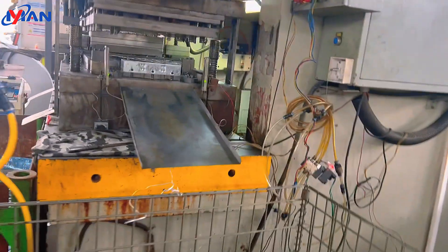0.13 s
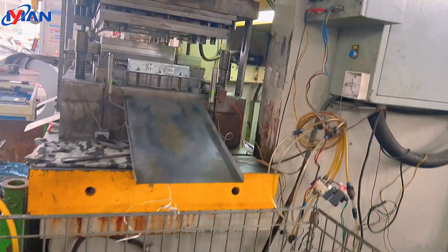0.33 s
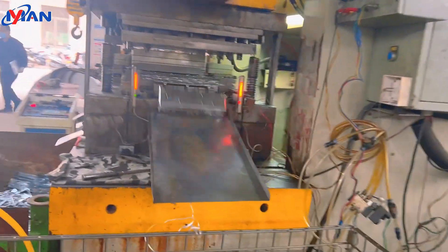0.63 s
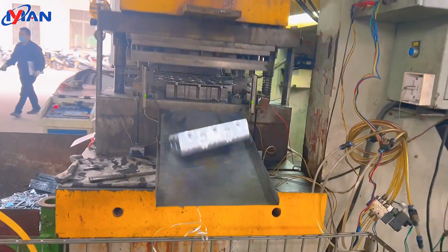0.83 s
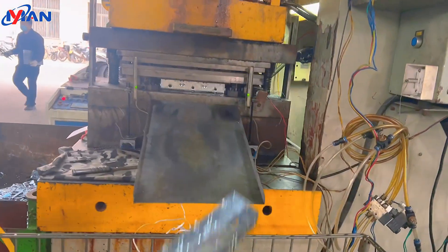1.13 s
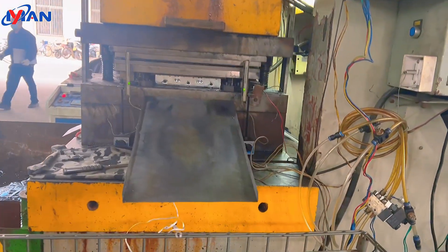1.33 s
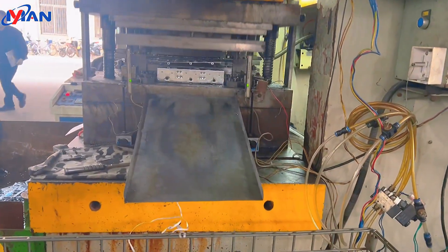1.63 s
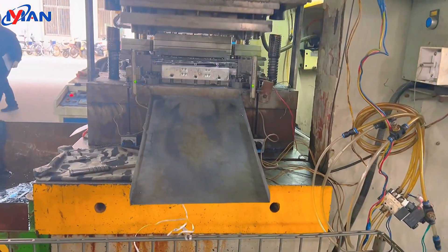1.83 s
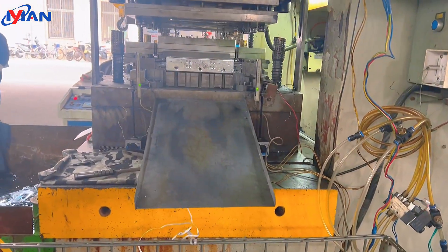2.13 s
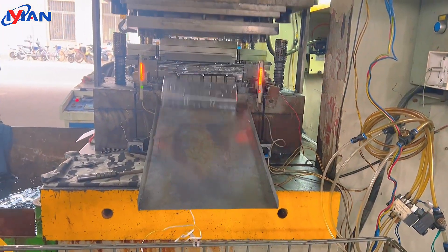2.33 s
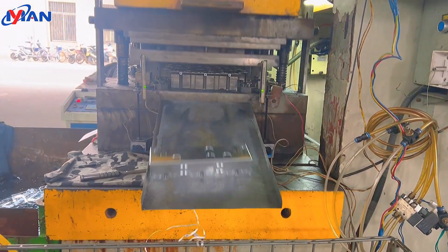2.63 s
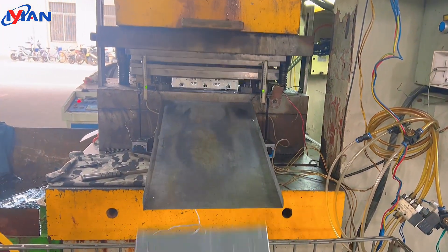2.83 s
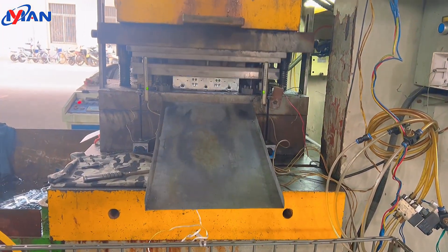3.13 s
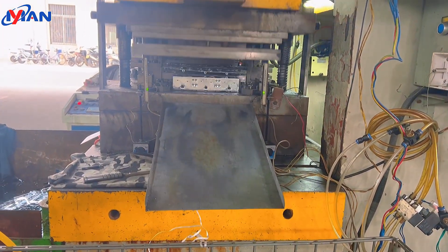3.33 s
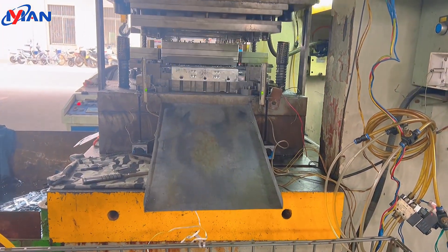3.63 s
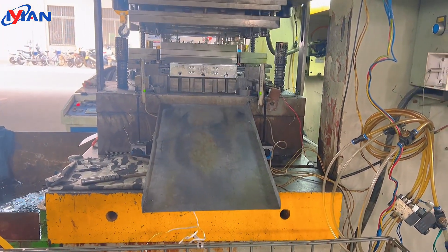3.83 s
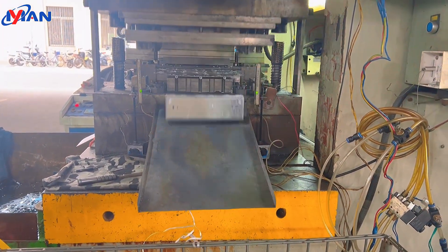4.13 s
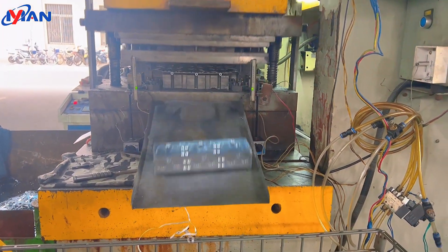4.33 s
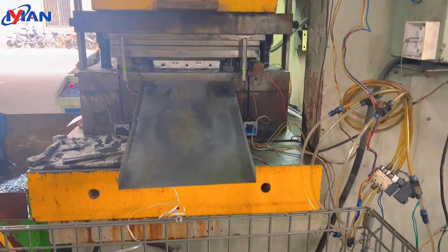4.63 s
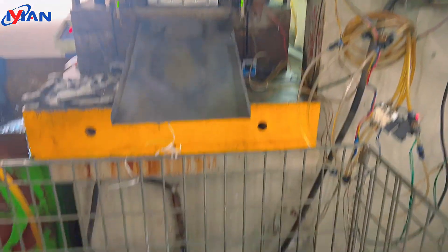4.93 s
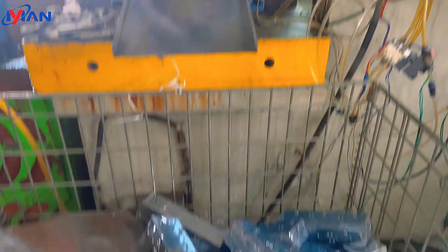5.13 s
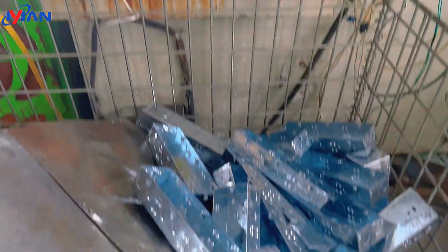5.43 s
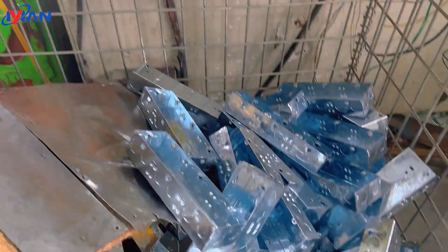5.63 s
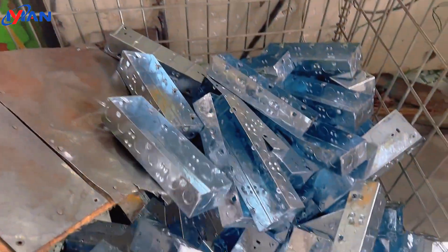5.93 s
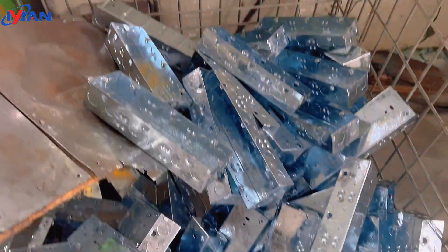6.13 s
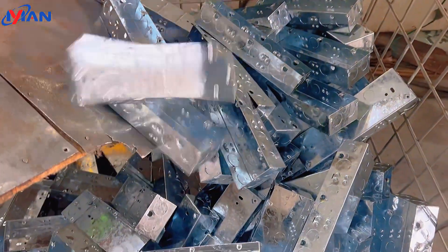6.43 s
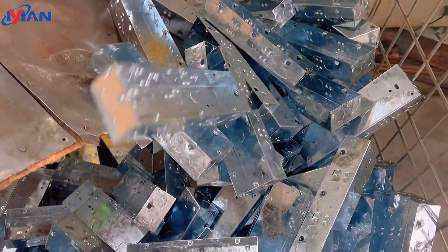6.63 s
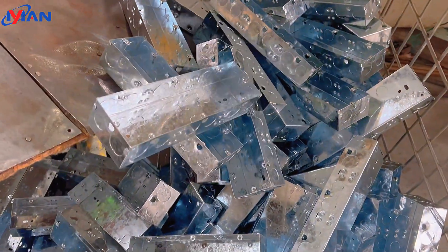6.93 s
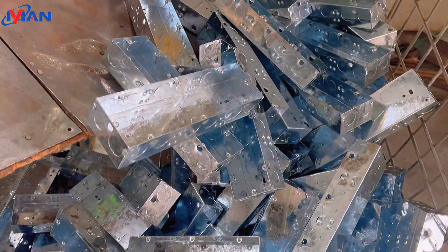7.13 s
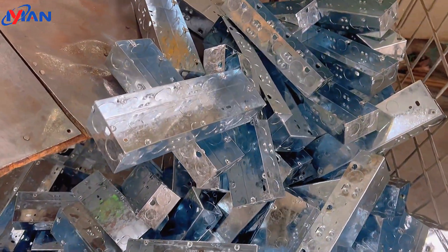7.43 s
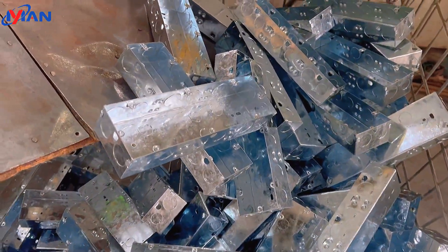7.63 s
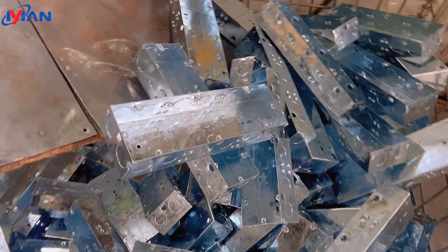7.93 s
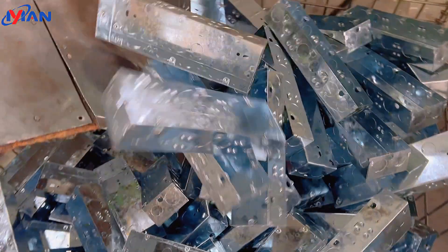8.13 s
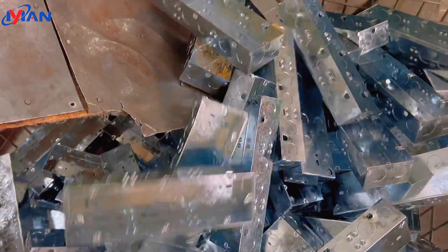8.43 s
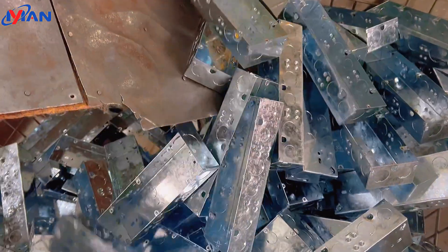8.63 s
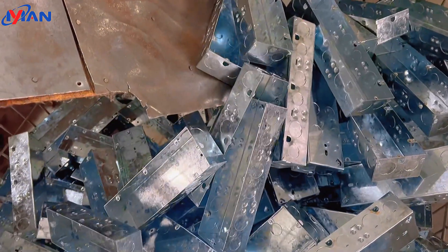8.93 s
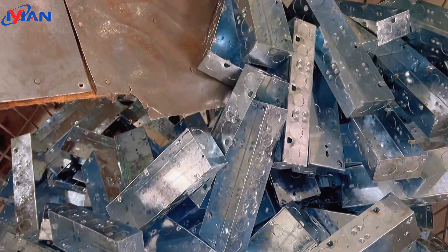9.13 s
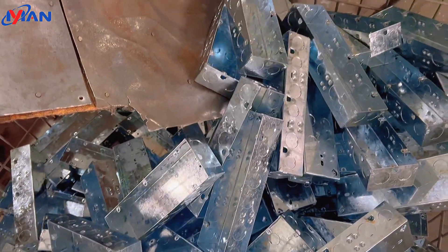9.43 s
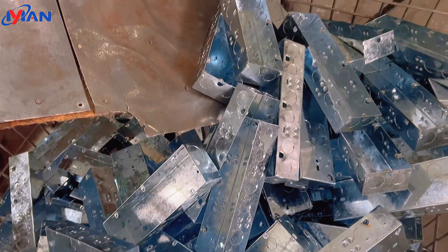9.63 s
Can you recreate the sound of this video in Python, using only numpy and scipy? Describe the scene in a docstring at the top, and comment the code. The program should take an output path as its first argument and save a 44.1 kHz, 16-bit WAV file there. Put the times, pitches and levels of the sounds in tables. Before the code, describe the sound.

A mechanical press thuds every 1.7 seconds over a steady shop drone while sheet-steel brackets clang, skid down a chute and crash onto a heap.

```python
"""In a workshop, a mechanical press stamps sheet-steel brackets, one stroke every 1.7 s, over a steady shop drone.
Each stroke strikes the resonant frame in a fixed series of blows and ends in a short stick-slip groan.
The mechanism squeaks once a turn. Between strokes a bracket is kicked off the die, rocks, drops onto a chute,
skids down it and crashes onto the heap just after the next stroke: coloured noise grains drive the sheet's modes."""
import sys
import numpy as np
from scipy import signal
from scipy.fft import rfft, irfft, next_fast_len
from scipy.io import wavfile
from scipy.ndimage import uniform_filter1d

SR = 44100
rng = np.random.default_rng(int(sys.argv[2]) if len(sys.argv) > 2 else 0)


def generate_wav(sig):
    """Save sig (samples, or channels by samples) to the path in sys.argv[1] as 16-bit PCM at SR."""
    pcm = np.round(np.clip(np.atleast_2d(sig).T, -1, 1) * 32767).astype(np.int16)
    wavfile.write(sys.argv[1], SR, pcm)


N = 431298
TIME = np.arange(N) / SR

# The punch meets the strip. Each row: contact in seconds, strength in dB.
PRESS_STROKES = [(-.635, 3), (1.073, 4), (2.780, 1.5), (4.489, 0.5), (6.197, 0), (7.905, 0), (9.613, -2.5)]
# The ejector kicks a finished bracket off the die. Each row: start in seconds, clang in dB, low ring in dB.
EJECTOR_KICKS = [(0.4274, -10, -20), (2.132, -14, -22), (3.840, -15, -14), (5.458, -11, -19),
                 (7.2586, -18, -37), (8.963, -21, -23)]
# A bracket lands and the heap settles. Each row: start in seconds, clang in dB, settling in seconds, settling in dB.
HEAP_LANDINGS = [(1.2477, -5.5, 0.36, -15.5), (2.9624, -7.5, .24, -12), (4.6628, -17, 0.4, -14),
                 (6.3721, -10.5, 0.3, -14.5), (8.0747, -4, .3, -14.5)]


def from_db(db):
    """Decibels to amplitude gain."""
    return 10 ** (np.asarray(db) / 20)


def rms_one(x):
    """Scale to unit power."""
    return x / np.sqrt(np.mean(x ** 2) + 1e-20)


def per_bin(points):
    """A table interpolated over log frequency, read at every FFT bin."""
    hz, value = np.transpose(points)
    bin_hz = np.fft.rfftfreq(next_fast_len(N), 1 / SR)
    return np.interp(np.log(bin_hz + 1), np.log(hz), value)


def add(track, s, sound):
    """Mix a sound into a track from time s on."""
    at = round(s * SR)
    sound, at = sound[max(-at, 0):], max(at, 0)
    track[at:at + len(sound)] += sound[:max(N - at, 0)]


def dying(t, t60):
    """Exponential decay, 60 dB in t60 seconds."""
    return np.exp(-np.log(1000) * t / t60)


def cycle(rows):
    """A level curve repeated at every stroke and scaled by its strength, as a gain."""
    after, db = np.transpose(rows)
    shape = from_db(np.interp(np.arange(after[0], after[-1], 1 / SR), after, db))
    out = np.zeros(N)
    for s, strength_db in PRESS_STROKES:
        add(out, s + after[0], from_db(strength_db) * shape)
    return out


def grains(spectrum, spread_db):
    """Stereo stream of tiny contacts of uneven size, coloured by a spectrum; rms 1."""
    # How alike left and right are at each frequency. Each row: frequency in Hz, likeness from 0 to 1.
    likeness = [(30, .99), (120, 1), (500, 0.8), (1000, 0.7), (2000, 0.68), (4000, 0.22), (8000, 0.9),
                (15000, 1)]
    size_db = spread_db * np.repeat(rng.standard_normal(N // 32 + 1), 32)[:N]
    noise = rng.standard_normal((2, N)) * from_db(size_db)
    mid, side = rfft(noise, next_fast_len(N)) * from_db(per_bin(spectrum))
    alike = np.clip(per_bin(likeness), 0, 1)
    stereo = np.sqrt(1 + alike) * mid + np.sqrt(1 - alike) * side * [[1], [-1]]
    return rms_one(irfft(stereo, next_fast_len(N))[:, :N])


def ring(force, hz, t60):
    """Two-pole mode: a unit click sets a sine of height 1 ringing."""
    r, w = from_db(-60 / (t60 * SR)), 2 * np.pi * hz / SR
    return signal.lfilter([0, np.sin(w)], [1, -2 * r * np.cos(w), r * r], force + 1e-18)


def resonance(x, hz, width_hz):
    """Two-pole band-pass with gain 1 on top."""
    r = np.exp(-np.pi * width_hz / SR)
    zeros = np.array([1, 0, -1]) * (1 - r * r) / 2
    poles = [1, -2 * r * np.cos(2 * np.pi * hz / SR), r * r]
    return signal.lfilter(zeros, poles, x + 1e-18)


def slip(hz, length, edge, overtone_db, waver):
    """A burst of stick-slip: a slightly unsteady tone and its octave that stop when the parts let go."""
    t = np.arange(round((length + edge) * SR)) / SR
    wander = np.interp(t, np.linspace(0, t[-1], num=8), rng.standard_normal(8))
    phase = 2 * np.pi * np.cumsum(hz * (1 + waver * wander)) / SR
    envelope = np.interp(t, [0, edge, length, length + edge], [0, 1, 1, 0])
    return envelope * (np.sin(phase) + from_db(overtone_db) * np.sin(2 * phase))


def shop_drone():
    """Motor, flywheel and the rest of the shop: steady coloured noise."""
    # Each row: frequency in Hz, relative level in dB per Hz.
    drone_colour = [(25, -12), (55, 7.5), (100, -5), (170, 3.5), (300, 0), (500, -2.5), (1000, -4.5),
                    (2500, -26), (4000, -14.5), (9000, -64), (16000, -82)]
    return from_db(-40) * grains(drone_colour, spread_db=1.0)


def workshop(x, t60, treble_t60, wet_db):
    """A diffuse tail, different left and right, whose treble dies first."""
    t = TIME[:SR]
    noise = rng.standard_normal((2, SR))
    dull = signal.sosfilt(signal.butter(2, 2500, fs=SR, output="sos"), noise)
    tail = dull * dying(t, t60) + 2.1 * (noise - dull) * dying(t, treble_t60)
    tail *= t > .005
    tail *= from_db(wet_db) / np.sqrt(np.sum(dying(t, t60) ** 2))
    return x + signal.fftconvolve(x, tail, axes=1)[:, :N]


def edge_squeal():
    """The last bracket skids off the die on its edge and squeals by stick-slip."""
    out = np.zeros(N)
    squeal = slip(hz=2950, length=0.055, edge=0.019, overtone_db=-25, waver=0.008)
    add(out, 9.008, from_db(-22.5) * squeal)
    return out


def squeaks():
    """A thin squeal in a dry joint, which then lets go with a chirp, a tick and a short, lower clack."""
    # The joint slips once a turn. Each row: release in seconds, chirp in dB.
    joint_slips = [(0.078, -12.5), (1.7868, -8.5), (3.494, -11), (5.205, -14), (6.911, -19), (8.62, -26)]
    out, release = np.zeros((2, N))
    for s, db in joint_slips:
        squeal = slip(hz=2570, length=0.054, edge=0.0063, overtone_db=-28, waver=0.0088)
        add(out, s - .085, from_db(db - 20.5) * squeal)
        chirp = slip(hz=1996, length=0.00404, edge=0.0012, overtone_db=-20, waver=0.1)
        add(out, s, from_db(db) * chirp)
        add(release, s + .003, from_db([db]))
    clack = from_db(-11.0) * ring(release, hz=1390, t60=0.064)
    clack += from_db(-15) * ring(release, hz=2385, t60=0.1)
    burst = rng.standard_normal(2048) * dying(TIME[:2048], t60=.03)
    tick = signal.fftconvolve(release, burst)[:N]
    return out + clack + from_db(-10.0) * tick


def chatter(t60):
    """A crack and a dying chatter, as a gain."""
    t = TIME[:SR // 2]
    return dying(t, max(t60, .02)) + 0.1 * dying(t, t60=0.0079)


def rubbing(length, fade_db_per_s):
    """Loose steel starts to move at once, loses energy steadily, then comes to rest."""
    attack_s, release_t60_s = .008, .6
    t = TIME[:SR]
    moving = np.minimum(t / attack_s, 1) * from_db(-fade_db_per_s * t)
    return moving * dying(np.maximum(t - length, 0), release_t60_s)


def bracket_hits():
    """Every hit, sorted: start s, clang dB, leading mode Hz, low ring dB, crash dB, chatter t60 s."""
    # A bracket rocks, then drops flat onto the chute.
    # Each row: start in seconds, clang in dB, leading mode in Hz, low ring in dB.
    knocks = [(0.4777, -14.5, 2900, -16.5), (0.5197, -11.5, 2740, -26), (0.601, -14, 2070, -15),
              (2.1922, -15, 2090, -23), (2.283, -14, 2020, -10), (3.8874, -17.5, 2690, -13.5),
              (4.0116, -16.5, 2000, -11.5), (5.6115, -17, 2780, -20), (5.746, -31, 2720, -20),
              (7.3135, -17.5, 2860, -24.5), (7.3448, -20.5, 3020, -28), (7.4505, -19.5, 2026, -11),
              (8.965, -21.5, 2920, -24.5), (9.024, -23.5, 2810, -47), (9.3125, -32, 2940, -32.5)]
    # An edge strikes the chute or other brackets.
    # Each row: start in seconds, clang in dB, low ring in dB, crash in dB.
    clashes = [(0.203, -20, -31.5, -31), (0.7394, -16, -27, -27), (0.8617, -8, -25, -15.5),
               (1.3355, -11, -17, -20.5), (1.3987, -15.5, -24, -25.5), (2.2703, -12, -34, -33.5),
               (2.4274, -7.5, -18.5, -21.5), (2.6517, -14, -32, -27), (3.053, -8, -15, -21),
               (3.306, -8.5, -27, -21), (3.456, -35, -38, -25.5), (3.5234, -10, -24.5, -28),
               (4.1632, -22, -26.5, -29.5), (4.2976, -14, -31, -20), (4.6893, -9.5, -27, -20),
               (4.8127, -12.5, -21.5, -22.5), (4.9755, -17, -29, -27), (5.123, -19.5, -38, -36),
               (5.2644, -18, -43, -32.5), (5.5508, -24.5, -23, -28.5), (5.7777, -14.5, -20.5, -28),
               (5.887, -16, -24, -25), (5.951, -16, -35, -21.5), (6.0088, -15.5, -25, -18),
               (6.4224, -10.5, -15, -18.5), (6.6893, -18, -26, -31), (6.7144, -16.5, -32, -26),
               (7.4617, -19, -20, -24), (7.5746, -21, -26.5, -28), (7.7077, -13, -30.5, -18),
               (8.3614, -16.5, -23.5, -32), (8.479, -12, -35, -30.5), (8.541, -8, -13, -23),
               (8.8118, -14.5, -36, -30), (9.405, -13.5, -28, -20)]
    low_hz, high_hz = 1943, 2355  # range of the leading mode in landings and clashes
    far_end_s, far_end_db = 0.034, -11  # the other end lands a moment later: delay, clang
    # crash and low-ring offsets are relative to the clang
    hits = [(s, db, 2740, ring_db, db - 12, 0.26) for s, db, ring_db in EJECTOR_KICKS]
    hits += [(s, db, hz, ring_db, db - 19.5, 0.37) for s, db, hz, ring_db in knocks]
    for s, clang_db, _, _ in HEAP_LANDINGS:
        for at, db in (s, clang_db), (s + far_end_s, far_end_db):
            hits.append((at, db, rng.uniform(low_hz, high_hz), db - 13, db - 9.5, 0.17))
    for s, db, ring_db, crash_db in clashes:
        hits.append((s, db, rng.uniform(low_hz, high_hz), ring_db, crash_db, 0.32))
    return sorted(hits)


def contacts(hits):
    """Hits, slides, the settling heap and the tooling add up in power; returns clang and crash gains."""
    # A bracket skids down the chute, or slips down the heap.
    # Each row: start in seconds, length in seconds, clang in dB, crash in dB.
    slides = [(0.01, 0.23, -15.5, -30.5), (0.619, .2, -11, -22.5), (2.314, 0.21, -12, -23),
              (2.687, .1, -19, -35), (3.33, .12, -20, -32), (3.47, .15, -16, -30), (4.039, 0.2, -21, -30.5),
              (5.476, 0.3, -18, -34), (5.739, 0.29, -12.5, -25), (7.47, 0.26, -28, -30.5),
              (8.57, .27, -13.5, -33), (9.151, 0.17, -20, -26)]
    # The tooling clicks at fixed points of every turn, levels relative to the stroke strength.
    # Each row: seconds after contact, clang in dB, crash in dB, chatter t60 in seconds.
    tool_clicks = [(-.05, -30, -34, .12), (.083, -21, -33, .16), (.866, -25, -32, .15)]
    # Strip feed and loose tooling rattle most around the stroke and rest at the top of the turn.
    # Each row: seconds after contact, clang in dB relative to the stroke strength.
    tool_rattle = [(-.45, -44), (-.12, -33), (0, -28), (.3, -33), (.7, -38), (.86, -46), (1.0, -54),
                   (1.25, -44)]
    slide_fade_db_per_s, settle_fade_db_per_s = 36, 18.5
    push_s, push_db, push_crash_db = .024, -16, -12  # nudge before a kick: lead, re kick, crash re nudge
    settle_crash_db, tool_crash_db = -15.5, -11  # relative to the clang
    idle_clang_db, idle_crash_db = -48, -54  # faint jingling that never stops

    bursts = [(s, clang_db, crash_db, chatter(t60)) for s, clang_db, _, _, crash_db, t60 in hits]
    for s, length, clang_db, crash_db in slides:
        bursts.append((s, clang_db, crash_db, rubbing(length, slide_fade_db_per_s)))
    for s, _, length, db in HEAP_LANDINGS:
        bursts.append((s, db, db + settle_crash_db, rubbing(length, settle_fade_db_per_s)))
    for s, kick_db, _ in EJECTOR_KICKS:
        db = kick_db + push_db
        bursts.append((s - push_s, db, db + push_crash_db, rubbing(push_s, slide_fade_db_per_s)))
    for s, db in PRESS_STROKES:
        for after, clang_db, crash_db, t60 in tool_clicks:
            bursts.append((s + after, db + clang_db, db + crash_db, chatter(t60)))

    tooling = cycle(tool_rattle)
    clang_power = tooling ** 2 + from_db(idle_clang_db) ** 2
    crash_power = (from_db(tool_crash_db) * tooling) ** 2 + from_db(idle_crash_db) ** 2
    for s, clang_db, crash_db, shape in bursts:
        add(clang_power, s, (from_db(clang_db) * shape) ** 2)
        add(crash_power, s, (from_db(crash_db) * shape) ** 2)
    return np.sqrt(clang_power), np.sqrt(crash_power)


def bounces(hits, per_s, t60, share, settle_t60):
    """After a hit's first firm contact, loose parts rebound at random, each touch dying at once; gain, rms near 1."""
    touches = (rng.random(N) < per_s / SR) * rng.uniform(0.47, 1, N)
    rebound = rms_one(signal.lfilter([1], [1, -dying(1 / SR, t60)], touches + 1e-18))
    firm = np.zeros(N)
    for s, *_ in hits:
        add(firm, s, dying(TIME[:SR // 3], settle_t60))
    loose = np.clip(share, 0, 1) * np.clip(1 - 2 * firm, 0, 1)
    return np.sqrt(1 - loose + loose * rebound ** 2)


def leading_modes(hits, ring_db, softness, full_contrast_db):
    """Where a bracket is struck picks the mode that sings; the blunter the contact, the more it stands out."""
    out, t = np.zeros(N), TIME[:SR // 3]
    rise = 1 - dying(t, t60=.003)
    for (s, clang_db, hz, _, crash_db, t60), draw in zip(hits, rng.random((len(hits), 2))):
        blunt_db = softness * min(clang_db - crash_db - full_contrast_db, 0)
        # bent flanges split the mode into a beating pair
        twin_hz = hz + 130 * (draw[0] - .5)
        pair = np.sin(2 * np.pi * hz * t) + 1.47 * np.sin(2 * np.pi * (twin_hz * t + draw[1]))
        decay = dying(t, 0.78 * max(t60, .02))
        add(out, s, from_db(clang_db + ring_db + blunt_db) * pair * rise * decay)
    return out


def flexing(hits, hz, t60, waver):
    """The sheet's lowest mode: each contact stops the old swing and starts a new one; the pitch wavers."""
    swing, decay = np.zeros(N), dying(TIME, t60)
    for s, _, _, ring_db, _, _ in hits:
        at = round(s * SR)
        swing[at:] = from_db(ring_db) * decay[:N - at]
    swing = signal.lfilter(*signal.butter(1, 45, fs=SR), swing)  # softens the onsets
    wander = rms_one(uniform_filter1d(rng.standard_normal(N), size=700))
    return swing * np.sin(2 * np.pi * np.cumsum(hz * (1 + waver * wander)) / SR)


def tinkling(hits, level, low_hz, high_hz, count, t60):
    """Hits and chance corner taps ring the many brackets lying about, each with its own pitch and place."""
    taps_per_s, spread_db = 34, 5.5  # spread: how unevenly a tap feeds the modes
    taps = rng.uniform(0, TIME[-1], round(taps_per_s * TIME[-1]))
    at = (np.append(np.array(hits)[:, 0], taps) * SR).astype(int) + 1
    pitches_hz = np.geomspace(low_hz, high_hz, num=count) * (1 + .02 * rng.standard_normal(count))
    out = np.zeros((2, N))
    for hz, place in zip(pitches_hz, rng.uniform(0, np.pi / 2, count)):
        force = np.zeros(N)
        uneven = from_db(spread_db * np.clip(rng.standard_normal(len(at)), -2, 2))
        force[at] = level[at] * uneven * rng.choice([-1, 1], len(at))
        out += np.outer([np.cos(place), np.sin(place)], ring(force, hz, t60))
    return out


def brackets():
    """Contacts excite the strong low modes of the sheet and a thicket of faint high ones."""
    # Ringing modes of a bracket and of the chute it strikes; the narrow one near 1090 Hz is the chute's. Each
    # row: frequency in Hz, width in Hz, relative level in dB.
    sheet_modes = [(883, 2.4, -4), (958, 37, -7.5), (1092, 5.1, 3), (1196, 8.1, -26), (1550, 11, -2),
                   (1677, 12, -4), (1960, 15, -5.5), (2025, 26.6, 2.5), (2237, 22, -1), (2270, 34, -1),
                   (2730, 25, 2), (2806, 100, -4.5), (2880, 25, 5.5), (3020, 22, 3), (3216, 30, -2)]
    # Broad colour of the sheet's clang. Each row: frequency in Hz, relative level in dB per Hz.
    clang_colour = [(300, -62), (650, -3.5), (900, 5), (1400, -3), (2100, 0.5), (2500, 1.5), (2950, -4.5),
                    (3500, -5.5), (5000, -13.5), (9000, -14.5)]
    # Colour of the sharp edge contacts. Each row: frequency in Hz, relative level in dB per Hz.
    crash_colour = [(40, -19), (200, 4.5), (400, 10), (650, 5.5), (1200, 3.5), (2500, 1.5), (4000, -3),
                    (6000, -0.5), (7200, -3.5), (8500, -2.5), (11500, 0), (13000, -11.5), (15500, -7)]
    hits = bracket_hits()
    clang_level, crash_level = contacts(hits)
    rattle = bounces(hits, per_s=70, t60=0.088, share=0.44, settle_t60=0.17)
    clang = clang_level * rattle * grains(clang_colour, spread_db=3.0)
    crash = crash_level * rattle * grains(crash_colour, spread_db=-0.5)

    hit_times, modes = np.array(hits)[:, 0], 0
    for k, (hz, width_hz, db) in enumerate(sheet_modes):
        # every hit lands somewhere else, and so favours other modes
        favour_db = db + 3.5 * rng.standard_normal(len(hit_times))
        favour = np.interp(TIME, hit_times, from_db(favour_db))
        modes = modes + (-1) ** k * resonance(clang * favour, hz, width_hz)
    high_hz = np.linspace(3500, 12500, num=22) + 130 * rng.standard_normal(22)
    thicket = sum((-1) ** k * resonance(crash, hz, width_hz=57) for k, hz in enumerate(high_hz))
    # ringing trails the contact by 2 ms; the mask drops what the roll wraps round
    ringing = from_db(-2.0) * modes + from_db(4.5) * thicket
    ringing = np.roll(ringing, round(.002 * SR), axis=1) * (TIME > .003)

    singing = leading_modes(hits, ring_db=-3.0, softness=0.98, full_contrast_db=26.5)
    singing += from_db(3.5) * flexing(hits, hz=854.5, t60=0.29, waver=0.0075)
    clinks = tinkling(hits, clang_level, low_hz=948, high_hz=3200, count=18, t60=0.12)
    pings = tinkling(hits, crash_level, low_hz=3490, high_hz=14520, count=24, t60=0.12)
    small = from_db(-21) * clinks + from_db(-18.5) * pings
    return from_db(-8.5) * clang + from_db(0.1) * crash + ringing + singing + small


def press():
    """Each stroke clamps and shears the strip, strikes the frame's modes, then groans as the punch pulls out."""
    # Each row: seconds after contact, blow in dB relative to the stroke strength.
    blows = [(0.001, -14), (0.0116, -7.5), (0.025, -15), (0.083, -12), (0.099, -8.5), (0.1155, -9.5),
             (0.148, -8.5)]
    # Modes of the press frame. Each row: frequency in Hz, relative level in dB, t60 in seconds.
    frame_modes = [(50.9, -38, 0.35), (75, -21, 0.35), (90.7, -19.5, 0.76), (115, -16.5, 0.18),
                   (174, -17.5, 0.13), (205.8, -12, 0.12), (255, -9, 0.06), (368, -10, 0.044),
                   (420, -33, 0.024), (504, -23, 0.018)]
    # Shaking of bed and floor. Each row: seconds after contact, relative level in dB.
    shake_curve = [(-.02, -36), (.015, -14), (0.049, -23), (.075, -26), (0.099, -14.5), (.18, -24),
                   (.26, -26), (.4, -27), (.7, -44), (1.1, -76)]
    # Colour of that shaking. Each row: frequency in Hz, relative level in dB per Hz.
    shake_colour = [(25, -36), (42, -36), (55, -1), (80, -9), (140, -8.5), (200, -6.5), (320, -6.5),
                    (520, -8.5), (750, -16), (1500, -22.5), (4000, -43)]
    # The punch bites ever harder, until the sheet gives.
    # Each row: seconds after contact, level in dB relative to the stroke strength.
    bite_curve = [(-.035, -35), (-.012, -22.5), (0, -18), (.005, -13), (.009, -27.5), (.035, -34)]
    # Colour of the shearing. Each row: frequency in Hz, relative level in dB per Hz.
    shear_colour = [(200, -7), (900, 2), (2400, 0), (3800, -8), (9000, -9.5), (15500, -9)]
    force, tones = np.zeros((2, N))
    pulse, t = np.hanning(32), TIME[:SR // 4]
    die_ping = from_db(-12.5) * np.sin(2 * np.pi * 2370 * t) * dying(t, t60=0.036)
    for s, strength_db in PRESS_STROKES:
        for delay, db in blows:
            add(force, s + delay, from_db(db + strength_db) * pulse / pulse.sum())
        clamping = slip(hz=443, length=0.0324, edge=0.0025, overtone_db=-22, waver=0.12)
        add(tones, s - .05, from_db(-31) * clamping)
        add(tones, s + 0.00135, die_ping)
        groan = slip(hz=301.3, length=0.0366, edge=0.0041, overtone_db=-31, waver=0.031)
        add(tones, s + .146, from_db(strength_db - 12.5) * groan)
    frame = sum(from_db(db) * ring(force, hz, t60) for hz, db, t60 in frame_modes)
    air_knock = from_db(-24) * ring(force, hz=120, t60=.018)  # the air shoved aside by each blow
    shearing = cycle(bite_curve) * grains(shear_colour, spread_db=2.0)
    shaking = cycle(shake_curve) * grains(shake_colour, spread_db=2.5)
    return from_db(3.0) * frame + air_knock + tones + shearing + from_db(-1.5) * shaking


def scene():
    """Press and brackets close by, the shop droning behind."""
    drone = shop_drone()
    metal = brackets() + squeaks() + edge_squeal()
    metal = workshop(metal, t60=0.98, treble_t60=0.21, wet_db=-12.5)
    return workshop(press(), t60=0.22, treble_t60=0.2, wet_db=-13.0) + metal + drone


def record(dry):
    """Left and right differ in level and phase by frequency; lowest bass and top are cut, peaks rounded."""
    # Each row: frequency in Hz, left-right level in dB.
    stereo_balance = [(300, 0), (700, -1.3), (2300, -.7), (4400, 3.3), (8100, .8), (12000, 0)]
    # Each row: frequency in Hz, phase in radians by which left leads.
    stereo_phase = [(300, 0), (1640, .1), (2930, 1.1), (3790, .7), (8000, .5), (8900, -.5), (10200, -3.14),
                    (11500, -5.5), (12200, -6.4), (13800, -9.4), (15400, -12.6)]
    half = np.array([[.5], [-.5]])
    stereo = from_db(half * per_bin(stereo_balance)) * np.exp(1j * half * per_bin(stereo_phase))
    heard = irfft(rfft(dry, next_fast_len(N)) * stereo, next_fast_len(N))[:, :N]
    heard = signal.sosfilt(signal.butter(4, 46, "high", fs=SR, output="sos"), heard)
    low_pass = signal.ellip(10, .2, 80, 15800, fs=SR, output="sos")
    return signal.sosfilt(low_pass, np.tanh(heard))


dry = scene()
out = record(dry)
generate_wav(out)
```